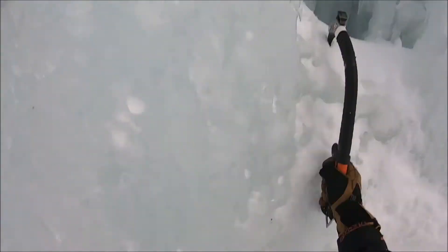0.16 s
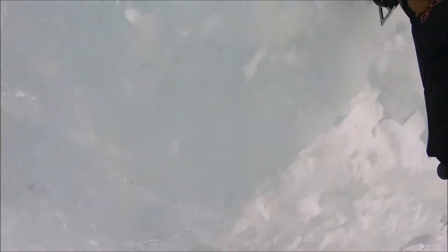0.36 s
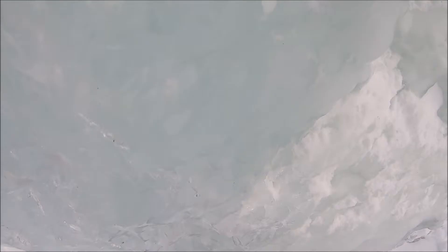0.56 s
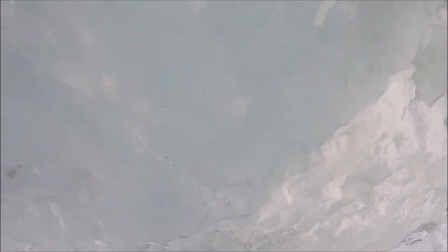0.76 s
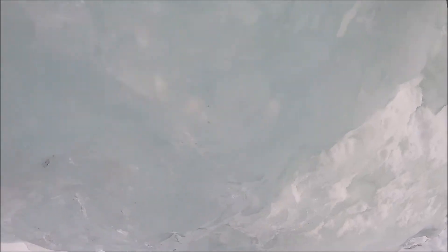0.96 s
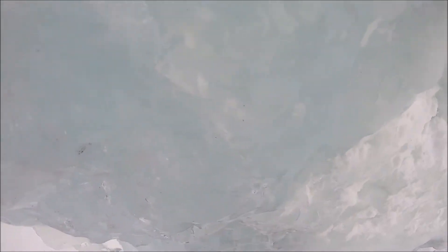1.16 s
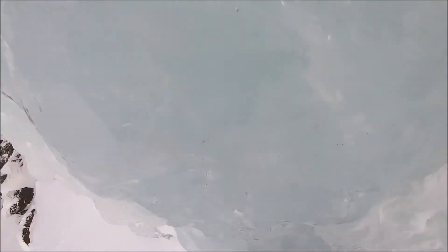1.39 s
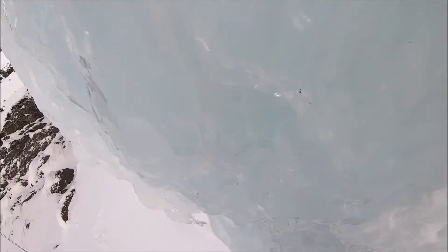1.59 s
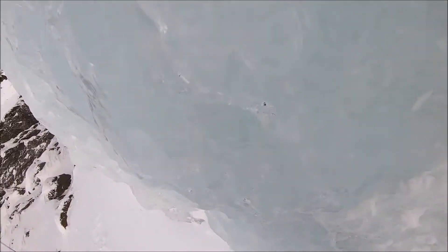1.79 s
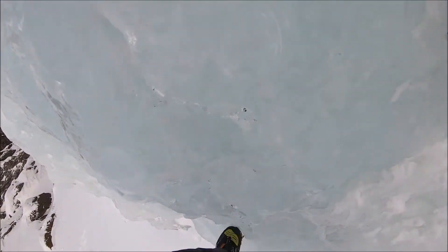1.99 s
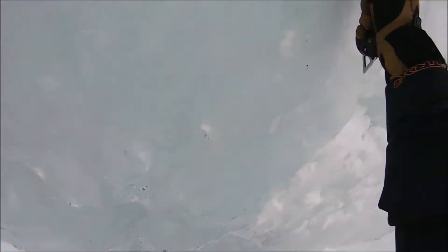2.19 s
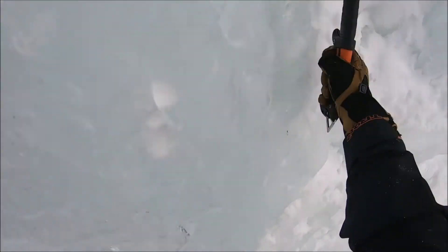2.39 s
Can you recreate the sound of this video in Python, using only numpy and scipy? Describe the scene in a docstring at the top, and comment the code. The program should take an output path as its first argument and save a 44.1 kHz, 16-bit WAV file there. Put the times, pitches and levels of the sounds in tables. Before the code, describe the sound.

An ice climber strikes solid ice twice, sharp crack and dull thud, amid crunches and wind rumble

```python
"""Two hard blows of an ice climber: bursts of coarse noise ring the ice modes, then a bent-decay sine thuds.
Metal scrapes open the scene; crunches (noise, ping, knock) and bright noise ticks come before, between and
after the blows; loose ice tumbles after the second.
Clothes and snow rustle as flickering noise in four bands, with crumbs of ice as short decaying sines.
Gusts buffet the two microphone ports as lumpy low noise, unrelated left and right, with one sine puff.
The stereo picture closes towards mono near the end."""
import sys
import numpy as np
from scipy import signal
from scipy.fft import rfft, irfft, next_fast_len
from scipy.io import wavfile

SR = 44100
rng = np.random.default_rng(int(sys.argv[2]) if len(sys.argv) > 2 else 0)


def persist_wave(psi):
    """Save psi, clipped to +-1, as 16-bit WAV."""
    counts = np.round(np.clip(psi, -1, 1) * 32767).astype(np.int16)
    wavfile.write(sys.argv[1], SR, np.atleast_2d(counts).T)


N = 108045

# Gusts on the ports, in groups: (time [s], level [dB])
GUST_GROUPS = [
    [(0.0, -54), (0.16, -76), (0.164, -57), (0.204, -28), (0.356, -58), (0.38, -33), (0.498, -26),
     (0.538, -74), (0.564, -40.5), (0.6, -30)],
    [(0.61, -32.5), (0.654, -39), (0.758, -30.5), (0.822, -42), (0.838, -31), (0.954, -33), (0.964, -44),
     (1.01, -24), (1.038, -35), (1.13, -26)],
    [(1.21, -31), (1.41, -40.5), (1.424, -30), (1.628, -25.5), (1.666, -39.5), (1.716, -26), (1.766, -41.5),
     (1.892, -25.5), (1.94, -70), (2.0, -36)],
    [(2.1, -38.5), (2.236, -37.5), (2.28, -51), (2.312, -47), (2.406, -39), (2.43, -57), (2.45, -32)],
]
# Gust spectrum: (frequency [Hz], relative density [dB])
WIND_SPECTRUM = [(24, -20), (40, -3), (124, -8), (409, -37), (500, -41), (620, -79.5)]
# Steadier deep rumble: (time [s], level [dB])
DEEP_RUMBLE = [(0, -36), (.15, -42.5), (.4, -29.5), (1., -33), (1.5, -31.5), (1.9, -32.5), (2.45, -39)]
# Gust balance: (time [s], left minus right [dB])
GUST_BALANCE = [(0, -17), (.1, 5), (.22, 18.5), (.33, -14), (.5, 17), (1.1, 11), (1.6, 8.5), (1.7, -0.5),
                (2., -17)]
# Single puffs of wind: (time [s], peak [dB], frequency [Hz], left minus right [dB])
WIND_PUFFS = [(1.7123, -15, 129.6, -8)]
# Port difference signal: (frequency [Hz], side against mid [dB])
SIDE_SPECTRUM = [(250, -15.5), (700, -6.5), (1300, -2), (2600, -7.5), (4000, -6.5), (5500, -2), (9000, 1.5),
                 (15000, 0)]
# Port colour: (frequency [Hz], left minus right [dB])
PORT_TILT = [(250, 0.5), (700, -2.5), (1400, -3), (2500, 0.5), (7000, -2.5), (9500, 6), (14000, 8.5)]
# Rustle: (time [s], low mids [dB], mids [dB], high mids [dB], treble [dB])
RUSTLE_LEVELS = [(0.0, -56.5, -54.5, -60.5, -69), (0.349, -39, -43.5, -50.5, -58.5),
                 (0.49, -53.5, -51, -59, -63), (0.7, -48, -60.5, -54.5, -56.5),
                 (0.87, -45.5, -62.5, -51, -58), (1.56, -48, -52.5, -56, -58.5),
                 (1.76, -43.5, -66.5, -54.5, -68), (2.01, -45.5, -61, -50, -68),
                 (2.18, -43, -49, -50, -63.5), (2.45, -49, -56.5, -49, -61.5)]
# Rustle spectrum: (frequency [Hz], relative density [dB])
RUSTLE_SPECTRUM = [(120, 32.5), (200, 18), (263, 5.5), (596, -1), (1130, -16.5), (1840, -19.5),
                   (5910, -33.5), (7480, -30.5), (13200, -48), (15500, -61)]
# Flicker depth per rustle band: (low mids [dB], mids [dB], high mids [dB], treble [dB])
FLICKER_DEPTHS_DB = (2.35, 3.7, 1.5, 1.15)
# Hollows of the ice wall, colouring rustle and crunches: (frequency [Hz], width [octaves], gain [dB])
ICE_HOLLOWS = [(1480, 0.08, 3), (3300, 0.08, 3), (5100, 0.1, 4), (7600, 0.03, 4)]
# Loose ice tumbling after the second blow: (time [s], level [dB])
TUMBLE_LEVELS = [(2.055, -41), (2.08, -46), (2.139, -36.5), (2.24, -43), (2.33, -45), (2.4, -51.5)]
# Metal point scraping: (start [s], length [s], level [dB])
METAL_STROKES = [(0.036, 0.022, -41), (0.07, 0.0088, -46), (0.094, 0.019, -47.5)]
# Modes of the metal point: (frequency [Hz], width [Hz], gain [dB])
METAL_MODES = [(1600, 530, 3.5), (2640, 900, 10), (4150, 320, 7), (6560, 150, 12.5), (7200, 220, -7)]
# Ticks of ice chips: (time [s], level before filter [dB], centre [Hz])
CHIP_TICKS = [(0.576, -38, 5960), (1.4136, -37, 7600), (1.497, -41, 7240), (1.5953, -45, 7100),
              (1.6532, -43, 8450), (1.847, -43.5, 7500), (1.9868, -40, 8700), (2.3496, -42, 10700)]
# Small crunches: (time [s], level [dB], centre [Hz], treble [dB], low body [dB], noise t60 [s])
SMALL_CRUNCHES = [(0.194, -37.5, 1420, -73, -33.5, 0.042), (0.2445, -31.5, 1907, -62, -47, 0.033),
                  (0.264, -30, 1460, -50, -25.5, 0.022), (0.3107, -33, 2180, -67, -40, 0.023),
                  (0.384, -31, 1530, -74, -33, 0.021), (0.4144, -35.5, 1840, -44.5, -36, 0.028),
                  (0.433, -55, 1000, -60, -30, 0.025), (0.4468, -49, 1370, -42, -35, 0.052),
                  (0.677, -46, 900, -50, -34.5, 0.036), (0.7201, -40, 2510, -44, -54, 0.023),
                  (0.7595, -39.5, 1170, -39, -45, 0.069), (0.7902, -40.5, 610, -46, -24.5, 0.029),
                  (0.8654, -44, 5770, -26, -30.5, 0.015), (0.8941, -47, 5900, -46.5, -54, 0.19),
                  (0.938, -35.5, 7600, -36, -38, 0.076), (0.9793, -40, 2450, -47, -45, 0.16),
                  (1.0068, -36.5, 5530, -33.5, -71, 0.036), (1.0462, -41, 1440, -36, -41, 0.022),
                  (1.192, -52, 895, -60, -23, 0.02), (1.212, -52, 800, -39, -34.5, 0.024),
                  (1.2582, -35.5, 3150, -40, -40, 0.024), (1.3971, -27, 3440, -48, -36.5, 0.019),
                  (1.4854, -40, 1830, -55, -35, 0.13), (1.5425, -40.5, 2050, -63, -34.5, 0.15),
                  (1.6719, -34, 2940, -38.5, -54, 0.043), (1.795, -41, 2050, -62, -34.5, 0.069),
                  (1.8152, -66, 900, -61, -31.5, 0.026), (1.9834, -31, 1510, -33, -58, 0.017),
                  (2.0891, -34, 820, -69, -23, 0.027), (2.11, -31.5, 2070, -60, -22, 0.022),
                  (2.147, -39, 5100, -47, -46, 0.017), (2.1904, -28, 3110, -38, -26, 0.028),
                  (2.218, -35.5, 3120, -42, -30, 0.017), (2.2781, -36, 830, -65, -37, 0.14),
                  (2.3044, -32, 5170, -48, -46, 0.026), (2.3272, -38.5, 1250, -48, -35, 0.063)]
# Modes of the struck ice: (frequency [Hz], width [Hz], gain [dB])
ICE_MODES = [(470, 220, 4), (625, 250, 3.5), (876, 90, 4), (1240, 250, -2), (2435, 1640, -4),
             (3230, 69, -8), (3880, 400, -6.5), (5500, 300, -12), (6040, 1800, -11.5), (7780, 180, -3.5)]
# Hard blows: (bite start [s], rise [s], length [s], t60 [s], drive into the modes [dB],
#   brightness [dB per octave], top edge [Hz], thud start [s], thud pitch [Hz], thud level [dB],
#   thud t60 [s], thud bass edge [Hz], thud rise [s])
HARD_BLOWS = [(1.1558, 0.0027, 0.0096, 0.06, -9, -0.5, 9100, 1.1675, 181, 4.5, 0.019, 49, 0.006),
              (2.0318, 0.0034, 0.011, 0.085, -13, -1, 5500, 2.0392, 249, 3, 0.021, 150, 0.0038)]

DEEP_EDGE_HZ, LUMP_DB, LUMPS_PER_S = 67.8, 1.5, 23
TURN_RAD, TURNS_PER_S, SMEAR_STEP_RAD = 2.6, 18.6, 0.17
RUSTLE_BANDS_HZ = [(230, 950), (950, 1800), (1800, 5000), (5000, 30000)]
RUSTLE_GRIT_DB, OWN_FLICKER_RATIO = 2.0, 0.4
CRUMBS_PER_S, CRUMB_DB, CRUMB_SPREAD_DB, CRUMB_DECAY_CYCLES = 120, -12, 3.5, 4.7
TUMBLE_HZ, TUMBLE_WIDTH_HZ = 356, 91
METAL_TOP_HZ = 8300
TICK_T60_S, TICK_WIDTH_OCT = 0.015, 0.57
CRUNCH_RISE_S, CRUNCH_GRIT_DB = 0.0031, 2.5
PING_DB, PING_T60_S, BROAD_DB = -2, 0.025, -4
KNOCK_DB, KNOCK_HZ = -3.5, 522
THUD_BEND_EXPONENT, OVERTONE_RATIO, OVERTONE_DB = 1.31, 1.95, -13
BITE_LOW_HZ = 316
NARROW_SPAN_S, NARROW_DB, NARROW_EDGE_HZ, NARROW_TOP_DB = (1.68, 2.35), -28, 4770, -14.5
MIC_TOP_HZ, EDGE_HZ = 15200, 15800


def amp(db):
    """Decibels to linear gain."""
    return 10 ** (np.asarray(db) / 20)


def evened(x):
    """Scales x to rms 1."""
    return x / np.sqrt(np.mean(x ** 2) + 1e-20)


def read(points, hz):
    """Interpolates a spectrum table over log frequency."""
    f, value = np.transpose(points)
    return np.interp(np.log(hz + 1), np.log(f + 1), value)


def over_time(s, value):
    """Interpolates breakpoints over the whole scene."""
    return np.interp(np.arange(N) / SR, s, value)


def colour(x, gain):
    """Filters x by gain(Hz)."""
    size = next_fast_len(x.shape[-1] + 2048)
    spectrum = rfft(x, size) * gain(np.fft.rfftfreq(size, 1 / SR))
    return irfft(spectrum, size)[..., :x.shape[-1]]


def low_pass(hz, edge_hz, power):
    """Smooth gain falling above an edge."""
    return 1 / (1 + (hz / edge_hz) ** power)


def low_cut(hz, edge_hz, power):
    """Smooth gain falling below an edge."""
    return 1 / (1 + (edge_hz / (hz + 1)) ** power)


def hump(hz, centre_hz, octaves):
    """Gaussian gain over log frequency."""
    return np.exp(-.5 * (np.log2((hz + 1) / centre_hz) / octaves) ** 2)


def rings(hz, modes):
    """Complex response of parallel resonant modes."""
    return sum(amp(db) / (1 + 2j * (hz - f) / width) for f, width, db in modes)


def hollows(hz):
    """Gain of the hollows in the ice wall."""
    return amp(sum(db * hump(hz, f, octaves) for f, octaves, db in ICE_HOLLOWS))


def add(mix, s, sound):
    """Adds sound into mix at s seconds."""
    part = mix[..., round(s * SR):][..., :sound.shape[-1]]
    part += sound[..., :part.shape[-1]]


def slow(per_s):
    """Smooth random curve of rms 1, up to a rate."""
    return evened(colour(rng.standard_normal(N), lambda hz: low_pass(hz, per_s, 4)))


def grit(count, grit_db):
    """Dense breaking grains: noise whose level jumps every 12 samples, with a few large clicks."""
    size = np.repeat(rng.exponential(1, count // 12 + 1), 12)[:count]
    return evened(rng.standard_normal(count) * amp(grit_db * size))


def wind():
    """Lumpy low buffeting and deep rumble, unrelated at the two ports, plus half-cycle puffs."""
    gust_db = over_time(*np.transpose(sum(GUST_GROUPS, [])))
    balance_db = over_time(*np.transpose(GUST_BALANCE))
    deep_db = over_time(*np.transpose(DEEP_RUMBLE))
    out = []
    for share in (.5, -.5):
        lumps = rng.standard_normal(N) * amp(LUMP_DB * slow(LUMPS_PER_S))
        gust = evened(colour(lumps, lambda f: amp(read(WIND_SPECTRUM, f)) * low_cut(f, DEEP_EDGE_HZ, 4)))
        deep = evened(colour(rng.standard_normal(N), lambda f: hump(f, DEEP_EDGE_HZ / 2, 0.88)))
        out.append(gust * amp(gust_db + share * balance_db) + deep * amp(deep_db))
    out = np.array(out)
    for s, db, hz, pan_db in WIND_PUFFS:
        t = np.arange(0, 0.5 / hz, 1 / SR)
        puff = np.sin(2 * np.pi * hz * t) * np.hanning(len(t))
        add(out, s, amp(db + pan_db * np.array([[.5], [-.5]])) * puff)
    return out


def ports(x):
    """Colours each port and adds a phase-smeared side signal whose phase wanders at random, for width."""
    steps_rad = np.cumsum(SMEAR_STEP_RAD * rng.standard_normal(2000))
    steps_hz = np.linspace(0, SR / 2, len(steps_rad))
    side = colour(x, lambda f: amp(read(SIDE_SPECTRUM, f)) * np.exp(1j * np.interp(f, steps_hz, steps_rad)))
    turn = np.exp(1j * TURN_RAD * slow(TURNS_PER_S))
    side = (signal.hilbert(side, next_fast_len(N))[:N] * turn).real
    return np.array([colour(x, lambda f: amp(k * read(PORT_TILT, f) / 2)) + k * side for k in (1, -1)])


def rustle():
    """Fine grains of cloth and snow in four bands with separate swells and partly shared flicker."""
    s, *levels_db = np.transpose(RUSTLE_LEVELS)
    grains, shared = grit(N, RUSTLE_GRIT_DB), slow(35)
    out = np.zeros(N)
    for (lo, hi), level_db, depth_db in zip(RUSTLE_BANDS_HZ, levels_db, FLICKER_DEPTHS_DB):
        def tone(f):
            band_gain = np.sqrt(low_cut(f, lo, 8) * low_pass(f, hi, 8))
            return amp(read(RUSTLE_SPECTRUM, f)) * hollows(f) * band_gain

        flicker = shared + OWN_FLICKER_RATIO * slow(20)
        band = colour(grains * amp(depth_db * flicker), tone)
        out += evened(band) * amp(over_time(s, level_db))
    return out


def crumbs():
    """Scattered crumbs of ice, each a decaying sine, following the level of the rustle's mids."""
    size = amp(CRUMB_SPREAD_DB * np.minimum(rng.exponential(1, N), 4))
    size *= rng.random(N) < CRUMBS_PER_S / SR
    kind = rng.integers(0, 16, N)
    t, out = np.arange(600) / SR, np.zeros(N)
    for k, hz in enumerate(np.geomspace(700, 6000, 16)):
        crumb = np.sin(2 * np.pi * hz * t) * np.exp(-hz * t / CRUMB_DECAY_CYCLES) * (700 / hz) ** .5
        out += signal.oaconvolve(size * (kind == k), crumb)[:N]
    s, _, mids_db, high_mids_db, _ = np.transpose(RUSTLE_LEVELS)
    return evened(out) * amp(CRUMB_DB + over_time(s, (mids_db + high_mids_db) / 2))


def tumble():
    """Hollow rumble of loose ice: noise in one low resonance."""
    s, db = np.transpose(TUMBLE_LEVELS)
    noise = rng.standard_normal(N)
    x = evened(colour(noise, lambda hz: 1 / (1 + (2 * (hz - TUMBLE_HZ) / TUMBLE_WIDTH_HZ) ** 2)))
    return x * amp(np.interp(np.arange(N) / SR, s, db, -90, -90))


def stroke(start_s, length_s, db):
    """Quick uneven slips of a metal point ring its modes."""
    t = np.arange(0, length_s + 0.016, 1 / SR)
    shape = np.minimum(t / 0.002, 1) * amp(-60 * np.maximum(t - length_s, 0) / 0.072)
    slips = shape * grit(4000, grit_db=3.0)[:len(t)]
    ringing = colour(slips, lambda hz: rings(hz, METAL_MODES) * low_pass(hz, METAL_TOP_HZ, 10))
    return start_s, amp(db) * evened(ringing)


def tick(start_s, db, hz):
    """A tiny bright snap: decaying noise in one band."""
    t = np.arange(-.002, .03, 1 / SR)
    snap = (t > 0) * amp(db - 60 * t / TICK_T60_S) * rng.standard_normal(len(t))
    return start_s - .002, colour(snap, lambda f: hump(f, hz, TICK_WIDTH_OCT))


def crunch(start_s, db, hz, treble_db, body_db, t60_s):
    """Breaking grains with a brief pitched ping, a low knock and body, and a treble fizz."""
    t = np.arange(-.004, .09, 1 / SR)
    rise = np.clip(t / CRUNCH_RISE_S, 0, 1)
    grains = rise * amp(-60 * np.maximum(t, 0) / t60_s) * grit(len(t), CRUNCH_GRIT_DB)
    parts = [(db, lambda f: amp(BROAD_DB) * hump(f, 2180, 0.49) + hump(f, hz, 0.18)),
             (treble_db, lambda f: hump(f, 5170, 0.62)),
             (body_db, lambda f: hump(f, 432, 0.8))]
    grid_hz = np.linspace(0, SR / 2, 500)

    def tone(f):
        # each part is scaled to its own level, whatever its width
        return hollows(f) * sum(amp(d) * p(f) / np.sqrt(np.mean(p(grid_hz) ** 2)) for d, p in parts)

    ping = rise * amp(db + PING_DB - 60 * t / PING_T60_S) * np.sin(2 * np.pi * hz * t)
    knock_shape = np.exp(-.5 * ((t - CRUNCH_RISE_S) * KNOCK_HZ * 2) ** 2)
    knock = amp(body_db + KNOCK_DB) * np.sin(2 * np.pi * KNOCK_HZ * t) * knock_shape
    return start_s - .004, ping + knock + colour(grains, tone)


def blow(start_s, rise_s, length_s, t60_s, db, slope_db, top_hz,
         thud_s, thud_hz, thud_db, thud_t60_s, bass_edge_hz, thud_rise_s):
    """Ice shatters under the point and rings in its modes; then the mass lands with a short thud."""
    t = np.arange(0, .12, 1 / SR)
    shape = np.minimum(t / rise_s, 1) * amp(-60 * np.maximum(t - length_s, 0) / t60_s)

    def tone(hz):
        slope = amp(slope_db * np.log2((hz + 100) / 1000))
        return rings(hz, ICE_MODES) * slope * low_pass(hz, top_hz, 3) * low_cut(hz, BITE_LOW_HZ, 4)

    bite = amp(db) * colour(shape * grit(len(t), grit_db=2.5), tone)

    u = np.maximum(t + start_s - thud_s, 0)
    onset = np.sin(np.pi / 2 * np.minimum(u / thud_rise_s, 1)) ** 2
    overtone = amp(OVERTONE_DB) * np.sin(2 * np.pi * OVERTONE_RATIO * thud_hz * u)
    swing = onset * (np.sin(2 * np.pi * thud_hz * u) + overtone)
    decay = amp(thud_db - 60 * (u / thud_t60_s) ** THUD_BEND_EXPONENT)
    thud = colour(decay * swing, lambda hz: 1 - low_pass(hz, bass_edge_hz, 4))
    return start_s, bite - thud


def scene():
    """Near sounds through the ports, with wind straight on them."""
    near = rustle() + crumbs() + tumble()
    for play, rows in ((stroke, METAL_STROKES), (tick, CHIP_TICKS), (crunch, SMALL_CRUNCHES), (blow, HARD_BLOWS)):
        for row in rows:
            add(near, *play(*row))
    return ports(near) + wind()


def record(dry):
    """Closes the stereo picture towards mono near the end, the treble least; then limits the band."""
    mid, side = (dry[0] + dry[1]) / 2, (dry[0] - dry[1]) / 2
    shut = over_time(NARROW_SPAN_S, (0, 1))
    low = colour(side, lambda f: low_pass(f, NARROW_EDGE_HZ, 8))
    side = low * amp(NARROW_DB * shut) + (side - low) * amp(NARROW_TOP_DB * shut)
    both = colour(np.array([mid + side, mid - side]), lambda f: low_pass(f, MIC_TOP_HZ, 12))
    edge = signal.firwin(511, EDGE_HZ, window=("kaiser", 9), fs=SR)
    return signal.oaconvolve(both, edge[None], "same")


dry = scene()
out = record(dry)
persist_wave(out)
```